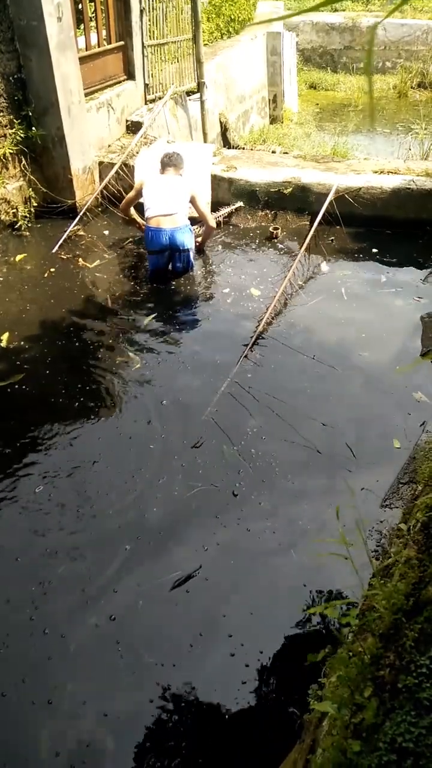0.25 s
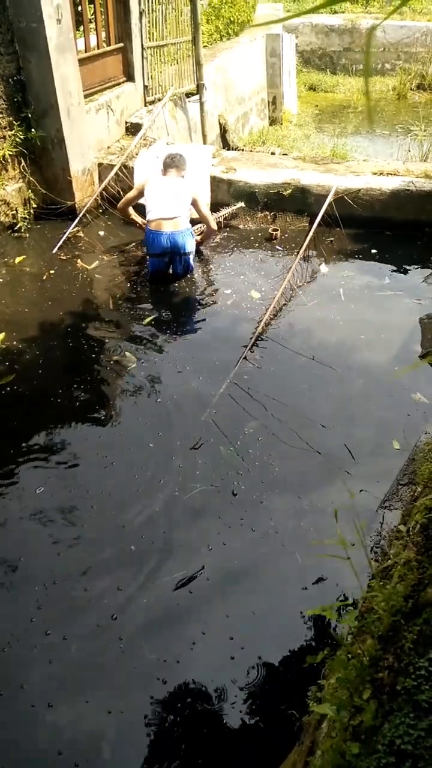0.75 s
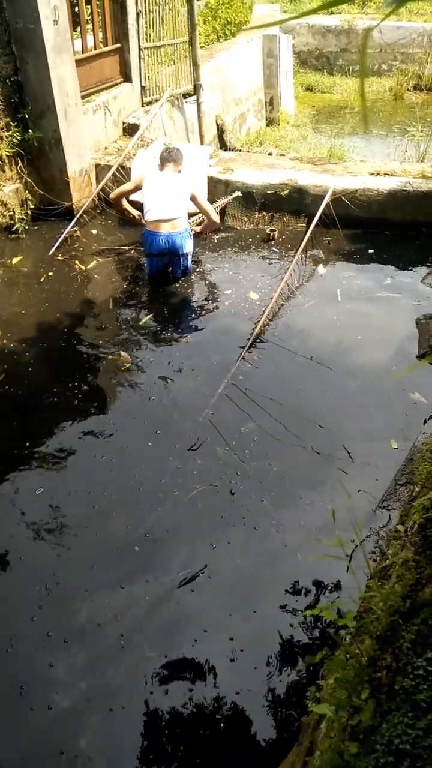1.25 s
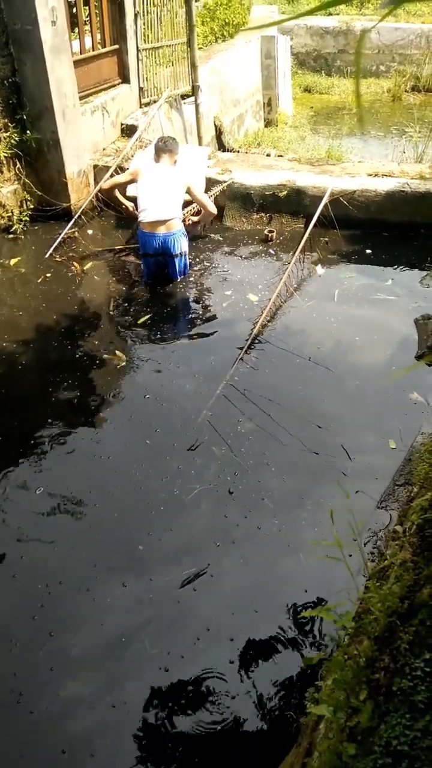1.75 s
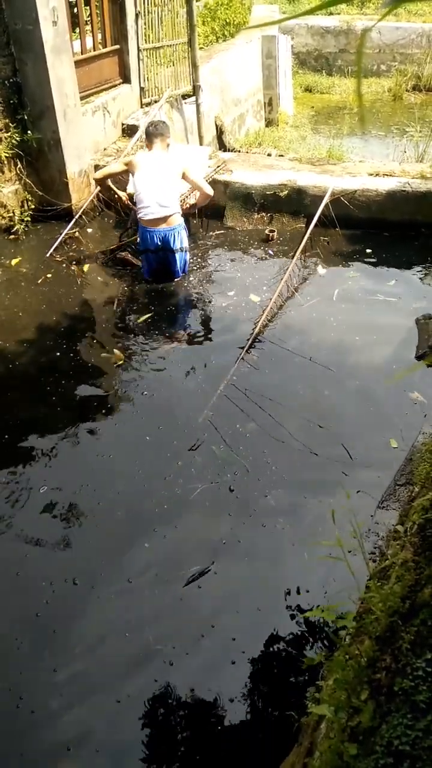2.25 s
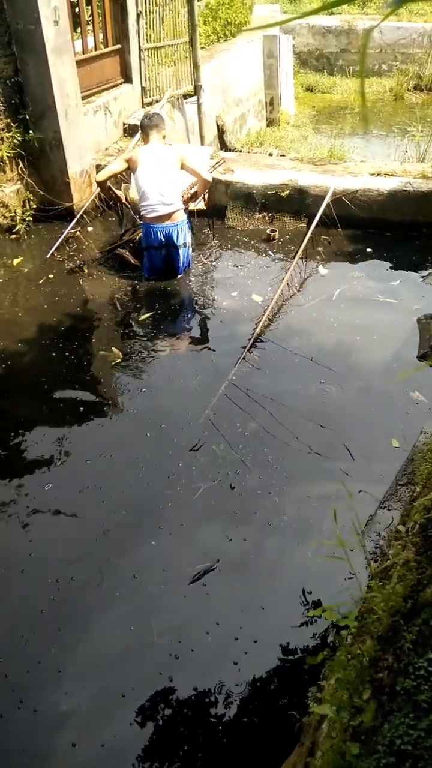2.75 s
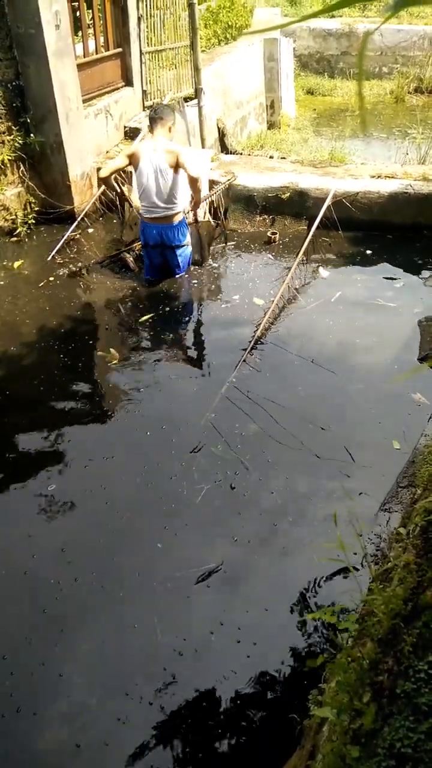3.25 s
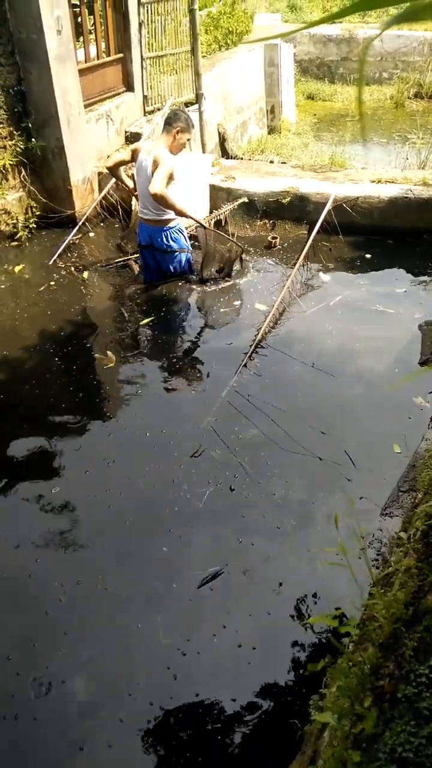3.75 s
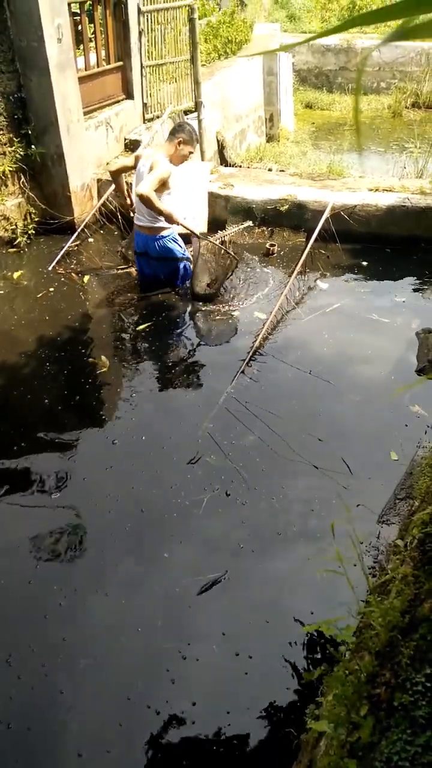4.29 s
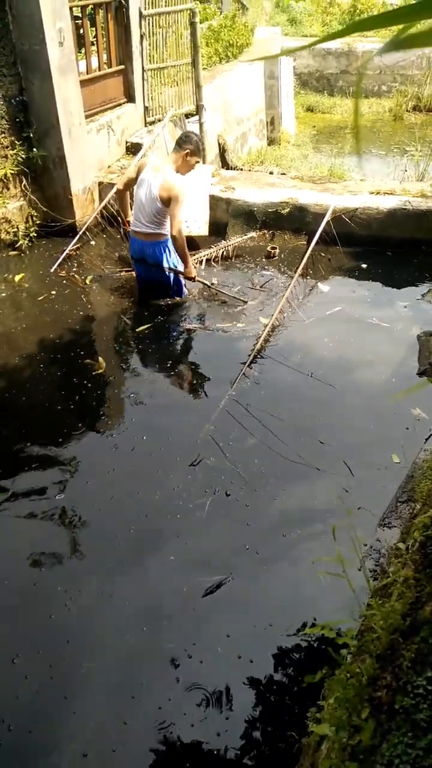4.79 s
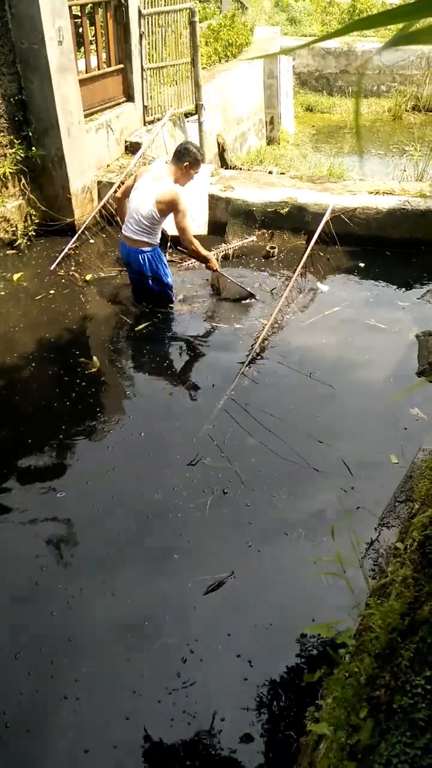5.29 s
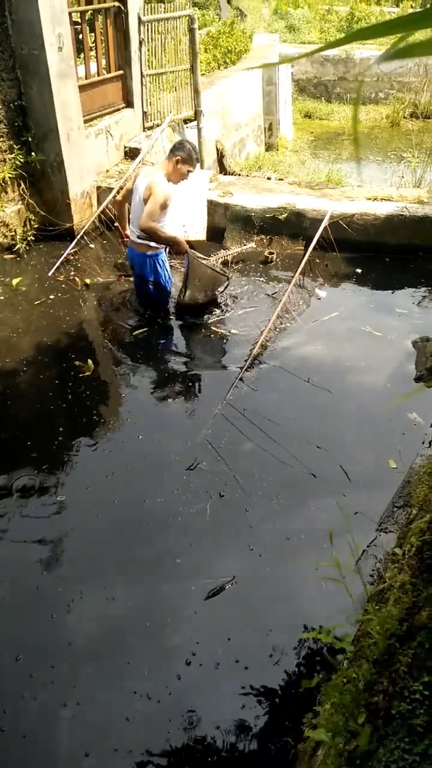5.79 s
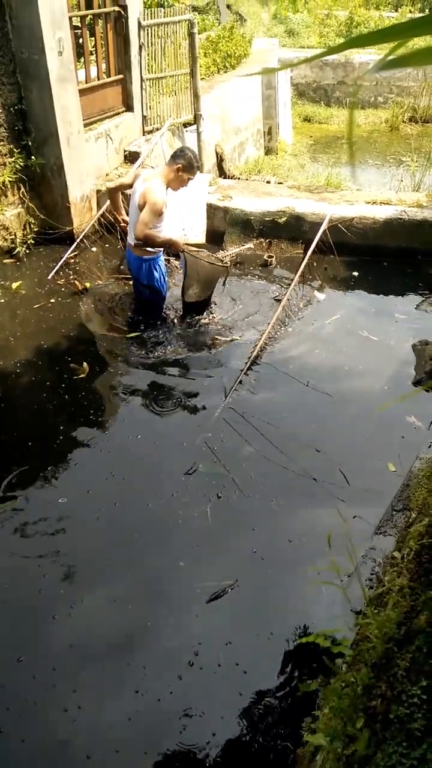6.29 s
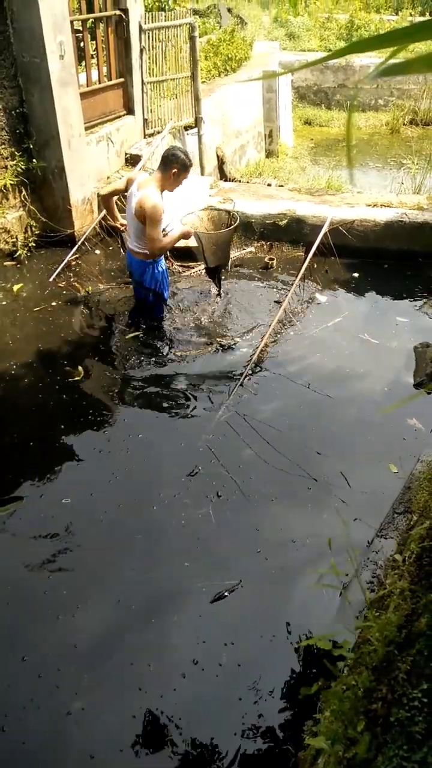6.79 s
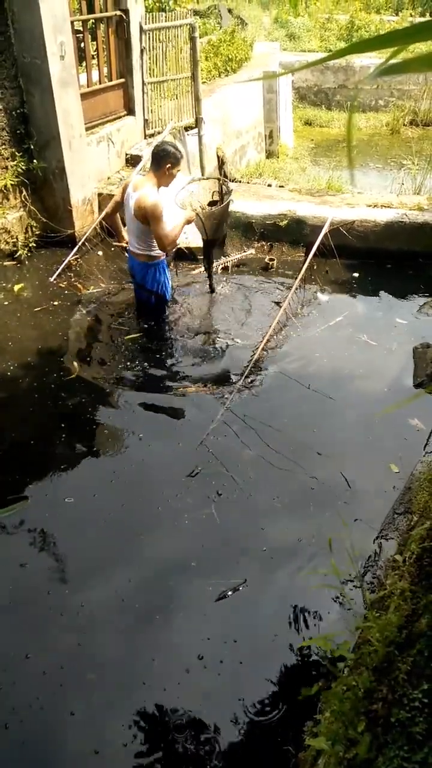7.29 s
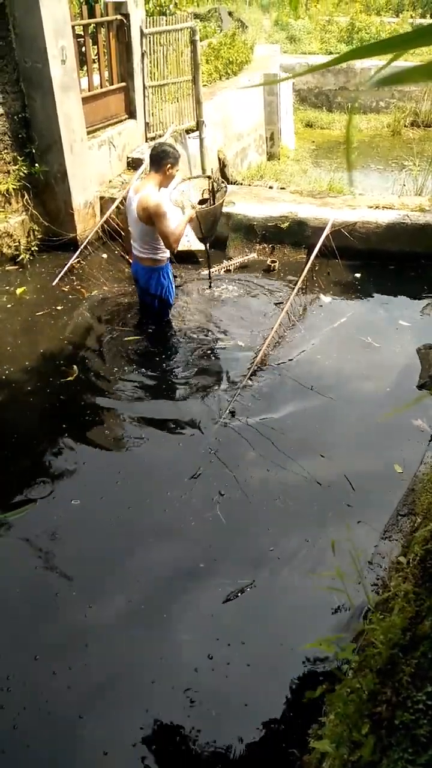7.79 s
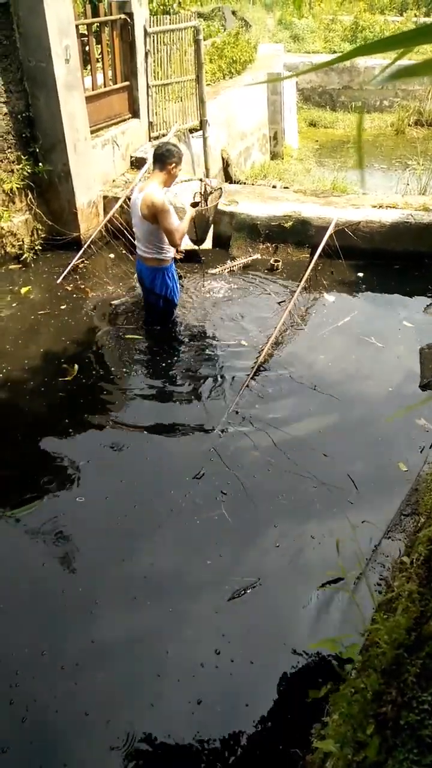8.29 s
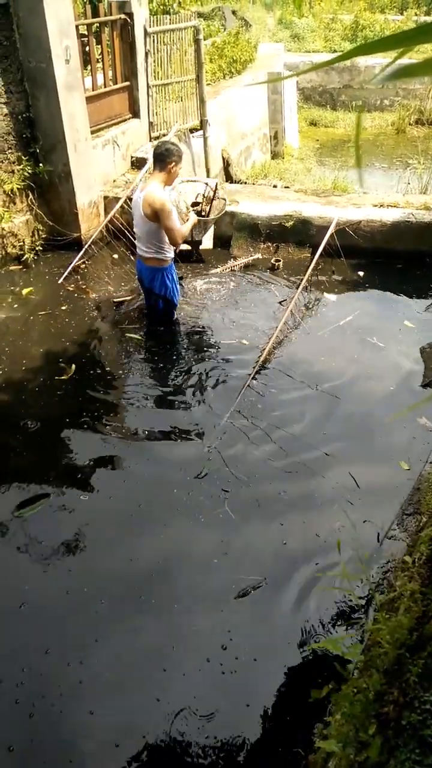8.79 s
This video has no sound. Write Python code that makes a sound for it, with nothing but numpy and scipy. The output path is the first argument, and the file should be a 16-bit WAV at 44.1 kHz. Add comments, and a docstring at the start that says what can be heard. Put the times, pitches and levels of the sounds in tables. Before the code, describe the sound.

A high, fluttering insect hiss fills the air around a pond, with sharp dry ticks close on the right. One nearby insect throbs in five short bouts while someone wades softly. A hand net then sweeps through the water with a slosh, spray and plops, and drains in a patter of drops. A small bird chirps once near the end, over very faint distant traffic.

```python
"""Insects hiss round a walled pond over a far traffic murmur and a faint drone; dry ticks snap close by.
The nearest insect throbs in five bouts while a wading man stirs the water. Near six seconds he sweeps
a hand net through it: a slosh of large bubbles, spray and plops. He lifts the net and it drains in a
patter of drops as the insects tire; a far engine picks up, a small bird calls once, the traffic swells."""
import sys
import numpy as np
from scipy import signal
from scipy.fft import rfft, irfft, next_fast_len
from scipy.io import wavfile
from scipy.ndimage import map_coordinates

SR = 44100
rng = np.random.default_rng(int(sys.argv[2]) if len(sys.argv) > 2 else 0)


def int16_out(signal):
    """Quantize to a 16-bit WAV file."""
    q = np.round(np.clip(np.atleast_2d(signal).T, -1, 1) * 32767)
    wavfile.write(sys.argv[1], SR, q.astype(np.int16))


N = 399105

# Stereo image, narrow in the bass and wide on top. Each row: frequency in Hz, left-right correlation.
STEREO_LIKENESS = [(60, 0.93), (290, 0.92), (640, 0.7), (1400, 0.55), (3000, 0.065), (14000, 0.058)]


def water_flow():
    """Gains of slosh, trickle and net stream: strokes swell over a quiet ripple, then the net drains."""
    # Laps, leg pushes and net sweeps. Each row: crest time, rise and fall in seconds,
    # slosh level in dB, trickle level in dB.
    strokes = [(.605, 0.043, 0.059, -82, -62), (.76, 0.097, 0.063, -90, -60), (2.46, 0.13, 0.25, -72, -64),
               (3.22, 0.32, 0.96, -79, -56.5), (3.33, 0.15, 0.19, -66, -72), (4.26, 0.27, 0.51, -93, -61.5),
               (5.61, 0.19, 0.091, -75, -60.5), (5.82, 0.11, 0.11, -59.5, -50.5),
               (6.0, 0.22, 0.2, -52, -45), (6.199, 0.63, 0.9, -66.5, -60), (6.33, .15, 0.17, -70, -56),
               (6.56, 0.11, 0.08, -64.5, -82), (7.135, 0.055, .06, -62.5, -57), (7.2, 0.05, 0.09, -62, -53),
               (7.52, 0.063, 0.17, -66.5, -52.5), (7.78, .12, .1, -66, -63),
               (9.03, 0.076, 0.19, -84, -58.5)]
    power = amp([[-85], [-73.5]]) ** 2  # resting slosh and trickle
    for crest_s, rise_s, fall_s, slosh_db, trickle_db in strokes:
        power = power + (amp([[slosh_db], [trickle_db]]) * surge(crest_s, rise_s, 0, fall_s)) ** 2
    pushed, running = np.sqrt(power)
    stream = amp(-56) * surge(7.304, rise_s=1.8, hold_s=0.61, fall_s=1.45)
    return pushed, running * amp(wobble(22)), stream * amp(wobble(22))  # running water comes in spurts


def slosh(strength):
    """Pushed water folds over and traps large bubbles in a soft wash."""
    # Tone of the slosh. Each row: frequency in Hz, gain in dB.
    tone = [(150, -34), (280, -5), (400, -2), (490, 0), (660, 0.5), (900, -3), (1200, 0), (2000, 1.5),
            (3500, -22), (8000, -52)]
    gulps = bubble_cloud(centre_hz=850, octaves=0.857, cycles=13, size_db=1.7, count=2100)
    water = spread(gulps + noise(), tone)
    return echoed(water * strength, wet_db=1) * lean(right_db=1)


def trickle(strength):
    """Thin streams patter on the pond as small bubbles over a fine spray."""
    # Tone of the trickle. Each row: frequency in Hz, gain in dB.
    tone = [(300, -41), (900, -8), (1500, -8), (2200, -3), (3000, 0), (4500, -7.5), (6500, -3), (9500, 3.5),
            (14000, -11.5)]
    patter = bubble_cloud(centre_hz=3356, octaves=0.742, cycles=4.4, size_db=5, count=6000)
    water = spread(patter + amp(-2.5) * noise(), tone)
    return echoed(water * strength, wet_db=1.5) * lean(right_db=8)


def draining_net(strength):
    """Water streams out of the lifted net and lands in a dense wash of tiny bubbles."""
    # Tone of the dribble. Each row: frequency in Hz, gain in dB.
    tone = [(300, -17), (600, -2), (900, -8), (1400, -8.5), (2000, -3), (2800, 0.5), (4000, -2),
            (6500, -6.5), (9500, -10), (14000, -13)]
    patter = bubble_cloud(centre_hz=2300, octaves=0.55, cycles=5.5, size_db=4.5, count=6000)
    water = spread(patter + amp(0.5) * noise(), tone)
    return echoed(water * strength, wet_db=1.5) * lean(right_db=5.5)


def splats():
    """The net breaks the surface and thrown droplets land together in a bright crackle."""
    # Bursts of spray. Each row: start in seconds, length in seconds, level in dB.
    bursts = [(5.78, 0.076, -44), (5.974, 0.067, -40.5), (6.017, 0.069, -56), (7.193, 0.035, -57),
              (7.464, 0.079, -48.5)]
    envelope = np.zeros(N)
    for start, length, db in bursts:
        add(envelope, start, amp(db) * np.hanning(int(length * SR)))
    landings = noise() * (rng.random((2, N)) < 0.12)
    crackle = unit(equalised(landings, [(2000, -7), (4800, 16), (9000, 15), (14000, -14)]))
    return echoed(crackle * envelope, wet_db=-2) * lean(right_db=9.5)


def drops():
    """Single plops: each is a ringing bubble with a brief spatter round its pitch."""
    # The featured drops. Each row: start in seconds, level in dB, pitch in Hz, decay in cycles.
    hits = [(.58, -64, 820, 5), (3.195, -63, 288, 11), (3.295, -46, 1280, 7.4), (3.298, -47.5, 1050, 7),
            (3.317, -52, 1030, 6.4), (3.335, -61, 566, 9), (3.808, -46, 2100, 8.2), (4.14, -50.5, 1660, 9),
            (4.219, -59, 1320, 9), (4.29, -59, 1300, 9), (4.32, -46, 2320, 9.8), (4.368, -61.5, 884, 11),
            (5.706, -58, 440, 5), (5.767, -56, 612, 7), (5.787, -53, 894, 12), (5.822, -52, 480, 6),
            (5.843, -56, 490, 6), (5.892, -43, 2210, 13), (5.894, -53, 640, 6), (5.919, -54, 560, 6),
            (5.958, -44, 1190, 11), (5.988, -47, 900, 9), (5.99, -50, 464, 8), (6.016, -49, 359, 7.2),
            (6.158, -46, 823, 11), (6.174, -57, 373, 6), (6.318, -49, 2150, 8), (6.34, -56, 950, 8),
            (6.415, -54, 1200, 9.9), (6.548, -55, 563, 7.4), (6.574, -54, 740, 6.6), (6.614, -48, 2030, 16),
            (6.722, -44.5, 1870, 7.4), (6.785, -60, 703, 12), (6.806, -53, 1060, 9.3),
            (6.885, -55, 768, 9.4), (6.922, -56, 720, 7), (7.0165, -43, 2166, 9), (7.186, -51.5, 245, 4),
            (7.513, -38, 2850, 7), (7.528, -39, 1900, 5), (7.7044, -34, 2800, 4), (7.75, -47, 1220, 7),
            (7.847, -41, 2050, 9.8), (7.904, -39, 2840, 5), (7.921, -38, 2700, 6.5), (7.953, -42, 2190, 7),
            (8.0102, -43, 2860, 4), (8.043, -39, 2960, 7), (8.1763, -41, 2360, 6.3), (8.182, -44, 2006, 7),
            (8.218, -44, 2000, 7), (8.485, -51, 1400, 5.4), (8.529, -38, 2660, 9.9), (8.603, -42, 2040, 7),
            (8.743, -47.5, 2160, 12), (8.978, -35, 3520, 6)]
    plops, t = np.zeros(N), np.arange(SR // 5) / SR
    for start, db, hz, cycles in hits:
        band = signal.butter(2, [0.7 * hz, 1.4 * hz], "bandpass", fs=SR)
        spatter = unit(signal.lfilter(*band, rng.standard_normal(len(t))))
        spatter *= amp(-8) * np.exp(-t * hz / cycles)
        add(plops, start, amp(db) * (bubble(t, hz, cycles, rise=0.07) + spatter))
    return echoed(plops, wet_db=-4.5) * lean(right_db=5)


def escaping_air():
    """Air escapes through the water in wavering gurgles and thin whistles."""
    # Each row: start and length in seconds, target pitch in Hz, upward glide as a share of it, level in dB.
    whistles = [(3.341, 0.049, 1071, -0.1, -56), (3.364, 0.069, 318, -.7, -68),
                (5.792, .05, 1496, 0.57, -59.5), (5.874, 0.07, 3640, 0.06, -40.5),
                (5.915, 0.05, 684, 0.2, -54.5), (5.993, 0.068, 4660, .02, -40),
                (6.021, 0.036, 1695, -.22, -55)]
    sound = np.zeros(N)
    for start, length, hz, glide, db in whistles:
        age = np.arange(int(length * SR)) / SR
        pitch = hz * (1 - glide * np.exp(-age / 0.0177) + 0.014 * wobble(130)[:len(age)])
        envelope = amp(db + 2.5 * wobble(130)[:len(age)]) * signal.windows.tukey(len(age), 0.2)
        add(sound, start, envelope * np.sin(phase_of(pitch)))
    return echoed(sound, wet_db=-4) * lean(right_db=5)


def drips(strength):
    """Fine stray drips at random moments, louder with the flow up to a ceiling."""
    count, centre_hz, ceiling = 220, 2450, amp(-54)
    plinks, t = np.zeros(N), np.arange(SR // 20) / SR
    for when, pitch, size in rng.random((count, 3)):
        at = int(when * N)
        ring = bubble(t, centre_hz * 2 ** (1.2 * (pitch - 0.5)), cycles=4.5, rise=0.05)
        add(plinks, at / SR, min(strength[at], ceiling) * amp(12 * size - 6) * ring)
    return echoed(plinks, wet_db=-8) * lean(right_db=-6)


def near_insect():
    """Each syllable scrapes through the insect's resonances; others keep the ring going between bouts."""
    # Throbbing bouts. Each row: start in seconds, end in seconds, level in dB.
    bouts = [(1.52, 1.765, -47.5), (1.976, 2.287, -39.5), (2.446, 2.805, -39.5), (3.03, 3.382, -42.5),
             (3.649, 3.985, -44)]
    # The insect's resonances. Each row: centre in Hz, width in Hz, gain in dB.
    modes = [(2860, 150, -10), (4070, 34, -6), (5580, 400, -0.5), (6190, 280, 2), (6630, 370, 4),
             (7130, 380, 3), (8840, 460, -5.5), (9580, 810, -6.5), (11000, 1040, -16.5), (12040, 330, -16)]
    syllables_per_s, scrapes = 25.5, np.zeros(N)
    for start, end, db in bouts:
        syllables = round((end - start) * syllables_per_s)
        progress = np.linspace(0, 1, int((end - start) * SR))
        throb = np.sqrt(np.abs(np.sin(np.pi * syllables * progress)))
        add(scrapes, start, amp(db) * throb * signal.windows.tukey(len(throb), 0.12))

    def body(hz):
        """The resonances in alternating polarity, with a steep low cut."""
        ring = sum((-1) ** k * amp(db) * 1j * hz * width / (centre ** 2 - hz ** 2 + 1j * hz * width)
                   for k, (centre, width, db) in enumerate(modes))
        return ring / (1 + (2600 / (hz + 1)) ** 8)

    rasp = filtered(noise(), body)
    rasp[0] = equalised(rasp[0], [(5400, -9), (6400, -4.5), (8000, -13)])  # the left side is shaded
    flutter = amp(0.9 * wobble(110))
    return unit(rasp) * np.hypot(scrapes, amp(chorus_db() - 9)) * flutter


def chorus_db():
    """Level of the insect chorus: steady, roused along with the nearest insect, then tiring."""
    roused = plateau(1.98, ramp_s=0.48, hold_s=2)
    tiring_s = np.maximum(np.arange(N) / SR - 6.18, 0)
    return -45.5 + 1.5 * roused - 2 * tiring_s


def insect_chorus():
    """Many insects merge into a fluttering hiss; now and then one buzzes out on the right."""
    # Tone of the hiss. Each row: frequency in Hz, left gain in dB, right gain in dB.
    tone = [(1170, -30, -30.5), (2240, -25, -29), (2860, -16, -5.5), (3390, -18, -8), (4130, -10.5, -4.5),
            (4560, -11, -8), (5370, -8.5, -1), (6610, 1.5, -0.2), (7420, -23, 0), (8000, -17, -4),
            (9180, -21, -2.5), (10920, -27.5, -14), (13800, -35.5, -28.5)]
    # Solo buzzes. Each row: start and end in seconds, centre and width in Hz, level in dB.
    buzzes = [(0.199, 0.71, 6030, 1500, -54), (1.085, 1.304, 5870, 800, -52.5),
              (2.262, 2.44, 3880, 850, -54), (2.786, 2.98, 4040, 1400, -57.5),
              (3.926, 4.123, 3850, 1390, -59.5), (3.966, 4.16, 6140, 450, -53),
              (5.141, 5.456, 6800, 900, -57), (6.267, 6.415, 6700, 248, -58), (6.7, 6.98, 7400, 1800, -59)]
    sides = [np.array(tone)[:, [0, side]] for side in (1, 2)]
    hiss = filtered(noise(), lambda hz: amp([along(side, hz) for side in sides]) * (hz > 900))
    flutter_db = 0.4 * wobble(9) + 0.6 * wobble(45) + 0.6 * np.array([wobble(160), wobble(160)])
    sound = unit(bank_reflections(hiss, gain=0.16, count=8)) * amp(chorus_db() + flutter_db)
    for start, end, hz, width_hz, db in buzzes:
        swell = signal.windows.tukey(int((end - start) * SR), 0.6)
        add(sound, start, amp(db) * swell * noise_band(hz, width_hz)[:, :len(swell)] * lean(right_db=15))
    return sound


def ticks():
    """Dry double snaps close on the right: a crack and a short woody ring."""
    # Each row: start in seconds, level in dB, attack and 60 dB decay in seconds,
    # ring gain in dB, crack low-pass in Hz, ring pitch in Hz.
    hits = [(0.1806, -20.5, 0.00009, 0.021, 1, 10500, 3180), (1.956, -29.5, .0003, 0.055, -6, 14000, 2300),
            (1.9905, -30.5, .0003, 0.084, 0, 12000, 4100), (2.443, -35, .001, 0.065, 2, 12000, 3000),
            (2.4665, -34, .0005, .04, -12, 12000, 3000), (2.885, -27.5, 0.0046, 0.065, -14.5, 12000, 3100),
            (3.528, -25.5, 0.0056, 0.079, -25, 11800, 3100), (7.191, -37.5, .0003, 0.045, 7, 8950, 2700),
            (7.949, -28.5, 0.0002, 0.028, -2, 7000, 2400), (8.601, -39, 0.0022, 0.1, 3, 11930, 3200)]
    # Tone of the crack. Each row: frequency in Hz, gain in dB.
    tone = [(300, -29), (1000, -29), (2000, -12.5), (3200, -9), (4500, -12), (6800, 4), (9500, 1.5),
            (12000, -10.5), (15000, -4)]
    rebound_s, rebound_db = 0.0058, -7
    cracks, rings, t = np.zeros((2, N)), np.zeros((2, N)), np.arange(SR // 6) / SR
    for start, db, attack_s, t60, ring_db, edge_hz, ring_hz in hits:
        rebound = (t > rebound_s) * amp(rebound_db - 60 * (t - rebound_s) / t60)
        envelope = amp(db) * (1 - np.exp(-t / attack_s)) * np.hypot(amp(-60 * t / t60), rebound)
        soften = signal.butter(2, edge_hz, fs=SR)
        add(cracks, start, signal.lfilter(*soften, envelope * noise(len(t))))
        wood = signal.iirpeak(ring_hz, Q=6.6, fs=SR)
        add(rings, start, amp(ring_db) * signal.lfilter(*wood, envelope * noise(len(t))))
    return echoed(equalised(cracks, tone) + rings, wet_db=-3) * lean(right_db=10.5)


def bird():
    """One sharp note from both sides of the throat: it scoops up hoarse, flicks and clears to a whistle."""
    call_s, rise_s, hoarse_s = 7.611, 0.064, 0.05
    flick_hz, flick_lead_s, flick_s, scoop_hz_per_s = 289, 0.018, 0.0076, 22000
    t = np.arange(N) / SR - call_s
    scoop = scoop_hz_per_s * np.clip(-t - flick_lead_s, 0, rise_s)
    flick = flick_hz * np.exp(-((t + flick_lead_s) / flick_s) ** 2)
    roughness = 0.012 + 0.036 * np.clip(-t / flick_lead_s, 0, 1)
    note = np.zeros(N)
    for hz, db in [(5510, -32.5), (5690, -37.5)]:
        phase = phase_of((hz + flick - scoop) * (1 + roughness * wobble(1200)))
        note += amp(db) * (np.sin(phase) + amp(-15.5) * np.sin(2 * phase))
    note *= surge(call_s, rise_s, hold_s=0.011, fall_s=0.022) * np.sqrt(np.clip(1 + t / hoarse_s, 0, 1))
    swell = np.hanning(int(hoarse_s * SR))
    rasp = noise_band(6800, width_hz=4400)[0, :len(swell)]
    add(note, call_s - hoarse_s, amp(-43.5) * swell * rasp)
    return echoed(note, wet_db=-2) * lean(right_db=12)


def engine():
    """A far engine comes into earshot, picks up and settles; its firing tone booms near top speed."""
    # Engine speed. Each row: time in seconds, firing rate in Hz.
    speed = [(7.25, 64.2), (7.48, 52.15), (7.75, 65.4), (8.05, 65.2), (8.25, 61.7)]
    # Overtones. Each row: multiple of the firing rate, gain in dB.
    orders = [(2, -9.5), (2.5, -14), (4.5, -19)]
    boom_hz, boom_width_hz, boom_db = 66.1, 2.7, 11.5
    hz = np.interp(np.arange(N) / SR, *np.transpose(speed))
    phase = phase_of(hz * (1 + 0.0118 * wobble(14)))
    boom = amp(boom_db * np.exp(-((hz - boom_hz) / boom_width_hz) ** 2))
    overtones = sum(amp(db + 0.96 * wobble(10)) * np.sin(k * phase) for k, db in orders)
    envelope = amp(-63.5) * surge(7.37, rise_s=0.42, hold_s=N / SR, fall_s=1)
    return envelope * (boom * np.sin(phase) + overtones)


def drone():
    """Faint far tones glide up to their pitch, swell and fade, blurred by echoes."""
    # Each row: start, length and glide time in seconds, top pitch in Hz, glide as a share of it,
    # octave gain in dB, level in dB.
    notes = [(0.22, 0.93, 0.4, 335, 0.27, -15, -75), (0.92, .2, .1, 337, 0.02, -18, -70),
             (4.7, 0.21, 0.19, 392, 0.12, -18, -69), (4.81, .11, .03, 392, .03, -15, -66),
             (4.85, 0.11, .03, 344, .02, -14, -65), (4.93, .14, .05, 356, .02, -14, -73)]
    sound, fade_s = np.zeros(N), 0.06
    for start, length, glide_s, top_hz, glide, octave_db, db in notes:
        age = np.arange(int(length * SR)) / SR
        hz = top_hz * (1 - glide * np.maximum(1 - age / glide_s, 0) ** 2)
        phase = phase_of(hz * (1 + 0.025 * wobble(90)[:len(age)]))
        fades = signal.windows.tukey(len(age), 2 * fade_s / length)
        envelope = amp(db + 2.1 * wobble(29.4)[:len(age)]) * fades
        add(sound, start, envelope * (np.sin(phase) + amp(octave_db) * np.sin(2 * phase)))
    return echoed(sound, wet_db=-6)


def traffic():
    """A bed of far traffic murmur that grows round the engine's passing."""
    # Tone of the murmur. Each row: frequency in Hz, gain in dB.
    tone = [(25, -26), (42, -6), (60, 1), (125, -4.5), (170, 0), (220, -5), (300, -10.5), (550, -18),
            (1200, -29.5), (2500, -21.5), (6000, -39)]
    nearer = plateau(8, ramp_s=1.5, hold_s=1.5)
    return spread(noise(), tone) * amp(-68.5 + 5 * nearer + 0.99 * wobble(3.58))


def bubble(t, hz, cycles, rise):
    """An air pocket rings for some cycles, rising in pitch as it nears the surface."""
    age = t * hz / cycles
    phase = 2 * np.pi * hz * t * (1 + rise * np.minimum(age, 4) / 2)
    return np.sin(phase) * np.exp(-age) * (1 - np.exp(-t * hz))


def bubble_cloud(centre_hz, octaves, cycles, size_db, count):
    """Bubbles of random time, pitch and size: a separate cloud of rms 1 in each channel."""
    t, clouds = np.arange(700) / SR, []
    for _ in range(2):
        hz = np.clip(centre_hz * 2 ** (octaves * rng.standard_normal((count, 1))), 250, 13000)
        size = amp(size_db * np.minimum(rng.exponential(size=(count, 1)), 3))
        at = rng.integers(0, N, (count, 1)) + np.arange(len(t))
        rings = size * bubble(t, hz, cycles, rise=0.059) * (1 - t / t[-1])
        clouds.append(unit(np.bincount(at.ravel(), rings.ravel(), N)[:N]))
    return np.array(clouds)


def echoed(x, wet_db):
    """A sound with the scattered answer of the pond walls, alike at both ears in the bass."""
    # Reverb of the walls. Each row: frequency in Hz, 60 dB decay in seconds.
    decay = [(200, 0.27), (2000, 0.22), (6000, 0.33), (12000, 0.26)]
    hz, t, scatter = signal.stft(noise(SR // 3), SR, nperseg=256)
    alike = along(STEREO_LIKENESS, hz)[:, None]
    scatter[1] = alike * scatter[0] + np.sqrt(1 - alike ** 2) * scatter[1]
    envelope = amp(-60 * t / along(decay, hz)[:, None]) * (1 - np.exp(-t / 0.0018))
    tail = signal.istft(scatter * envelope, SR, nperseg=256)[1]
    tail /= np.linalg.norm(tail[0])
    return x + amp(wet_db) * signal.fftconvolve(np.atleast_2d(x), tail, axes=1)[:, :N]


def bank_reflections(x, gain, count):
    """Weak early copies from the banks ripple the colour of a steady source."""
    taps = np.zeros((2, SR // 40))
    taps[:, 0] = 1
    for side in taps:
        side[rng.integers(SR // 600, len(side), count)] = gain * rng.choice([-1, 1], count)
    return signal.fftconvolve(x, taps, axes=1)[:, :N]


def spread(pair, tone):
    """Two unrelated signals become a coloured stereo field of rms 1, alike in the bass."""
    def mid_side(hz):
        angle = np.arccos(along(STEREO_LIKENESS, hz)) / 2
        return amp(along(tone, hz)) * np.array([np.cos(angle), np.sin(angle)])

    mid, side = filtered(pair, mid_side)
    return unit(np.array([mid + side, mid - side]))


def lean(right_db):
    """Pan gains that put the right channel right_db above the left."""
    return amp(np.array([[-right_db], [right_db]]) / 2)


def away(start, rise_s, hold_s, fall_s):
    """How far each moment lies outside a hold, counted in rise or fall times."""
    t = np.arange(N) / SR - start
    return np.maximum(-t / rise_s, 0) + np.maximum((t - hold_s) / fall_s, 0)


def surge(full_s, rise_s, hold_s, fall_s):
    """A gain that climbs 20 dB per rise time, holds at 1 from full_s and drops 20 dB per fall time."""
    return amp(-20 * np.minimum(away(full_s, rise_s, hold_s, fall_s), 10))


def plateau(full_s, ramp_s, hold_s):
    """A straight ramp from 0 to 1, a hold from full_s and a ramp back."""
    return np.maximum(1 - away(full_s, ramp_s, hold_s, ramp_s), 0)


def wobble(rate):
    """A smooth random curve, rate knots a second."""
    knots = rng.standard_normal(int(N * rate / SR) + 4)
    fine = np.linspace(0, len(knots) - 1, len(knots) * 10)
    return np.interp(np.arange(N) * rate / SR, fine, map_coordinates(knots, [fine]))


def noise(samples=N):
    """Stereo white noise."""
    return rng.standard_normal((2, samples))


def noise_band(hz, width_hz):
    """Stereo noise of rms 1 in one resonance, a second long."""
    detune = 2 * (np.fft.rfftfreq(SR, 1 / SR) - hz) / width_hz
    return unit(irfft(rfft(noise(SR)) / (1 + detune ** 2), SR))


def filtered(x, response):
    """x through a response given as a function of Hz."""
    size = next_fast_len(N + 8192)
    return irfft(rfft(x, size) * response(np.fft.rfftfreq(size, 1 / SR)), size)[..., :N]


def equalised(x, tone):
    """x through an EQ curve of (Hz, dB) points."""
    return filtered(x, lambda hz: amp(along(tone, hz)))


def along(points, hz):
    """Read between (Hz, value) points on a log frequency axis."""
    freqs, values = np.transpose(points)
    return np.interp(np.log(hz + 1), np.log(freqs + 1), values)


def phase_of(hz):
    """Running phase of a moving pitch."""
    return 2 * np.pi * np.cumsum(hz) / SR


def add(track, start, sound):
    """Mix a sound into a track at a start time in seconds."""
    part = track[..., max(round(start * SR), 0):][..., :sound.shape[-1]]
    part += sound[..., :part.shape[-1]]


def amp(db):
    """Decibels to gain."""
    return 10 ** (np.asarray(db) / 20)


def unit(x):
    """Scaled to rms 1."""
    return x / np.sqrt(np.mean(x ** 2) + 1e-20)


def scene():
    """Water in front, insects, ticks and the bird around it, far sounds a little to the right."""
    pushed, running, stream = water_flow()
    water = slosh(pushed) + trickle(running) + draining_net(stream)
    droplets = drips(np.hypot(running, stream)) + splats() + drops() + escaping_air()
    around = insect_chorus() + near_insect() + ticks() + bird()
    far = (engine() + drone() + traffic()) * lean(right_db=4)
    return water + droplets + around + far


def record(dry):
    """Two close microphones, the left reached first, with a steep cut of the highest treble."""
    left_lead_s, top_hz = 0.00011, 14350
    pair = filtered(dry, lambda hz: np.exp(1j * np.pi * hz * left_lead_s * np.array([[1], [-1]])))
    return filtered(pair, lambda hz: 1 / (1 + (hz / top_hz) ** 120))


dry = scene()
out = record(dry)
int16_out(out)
```